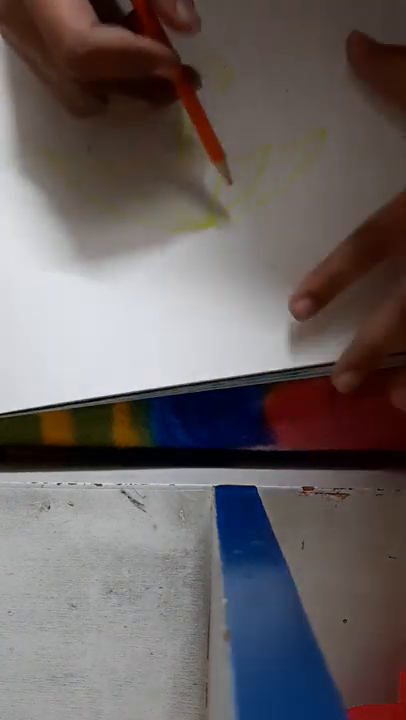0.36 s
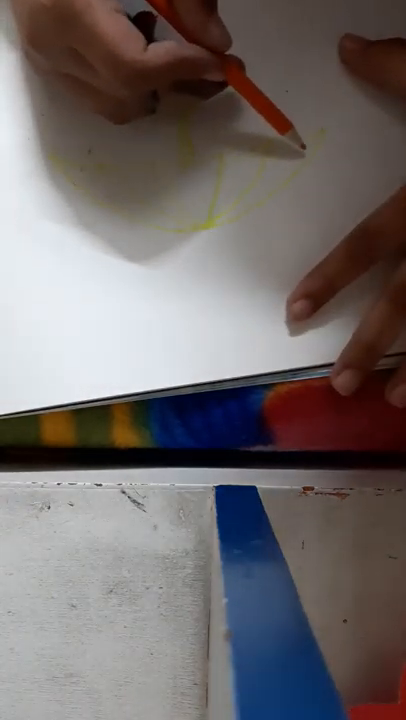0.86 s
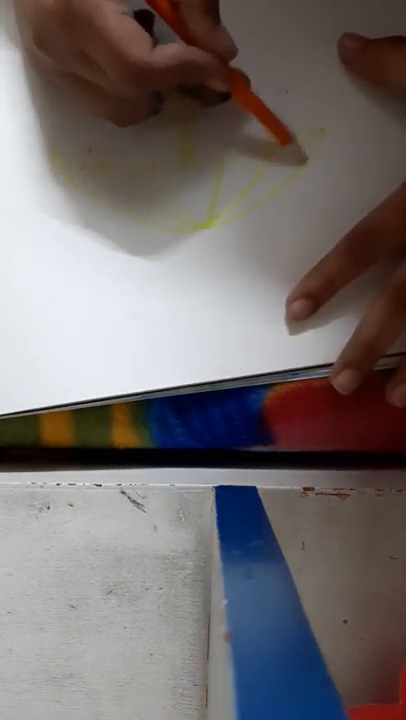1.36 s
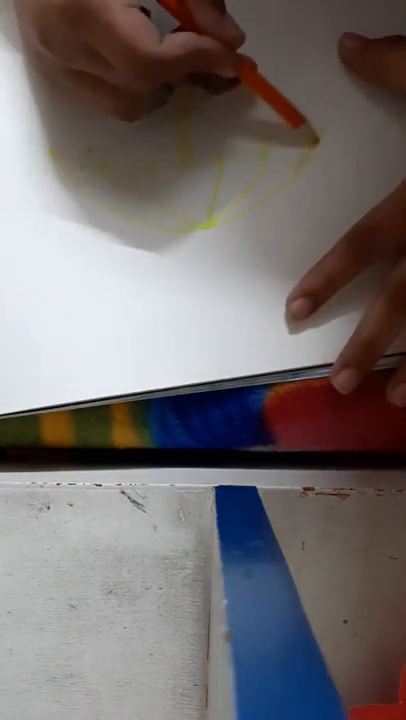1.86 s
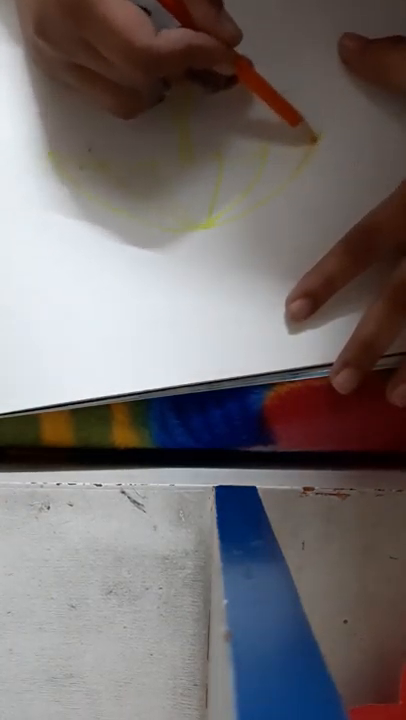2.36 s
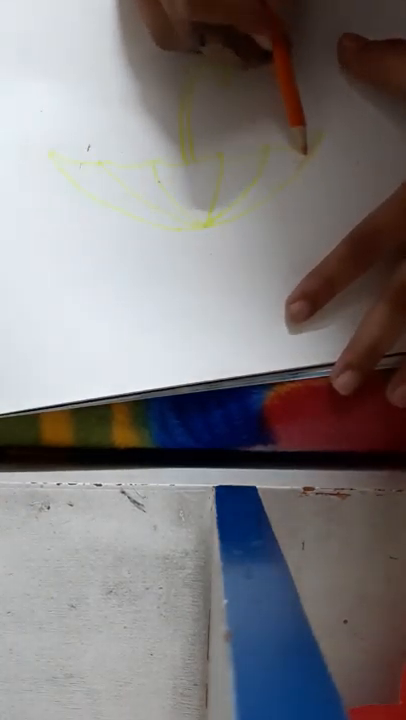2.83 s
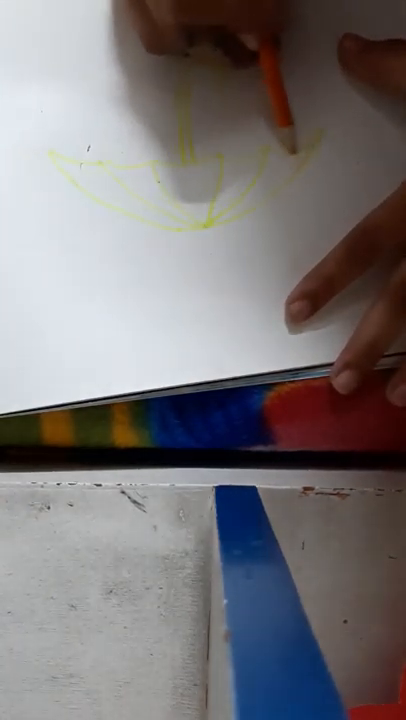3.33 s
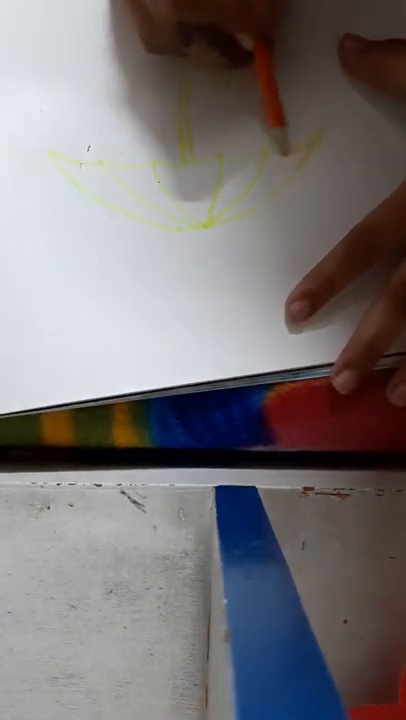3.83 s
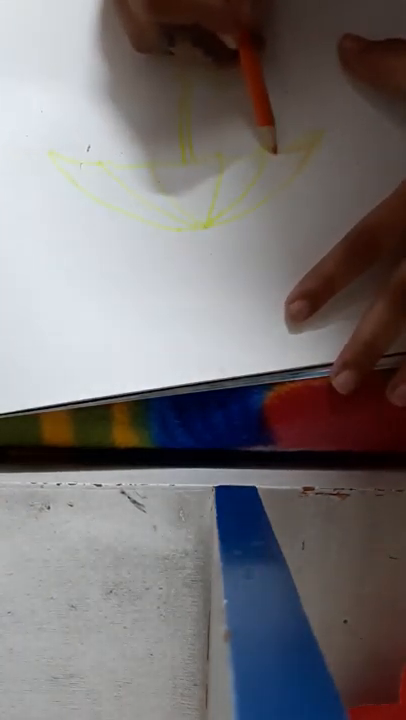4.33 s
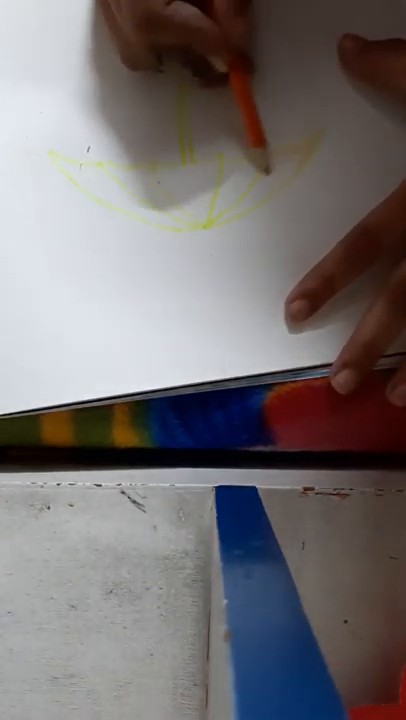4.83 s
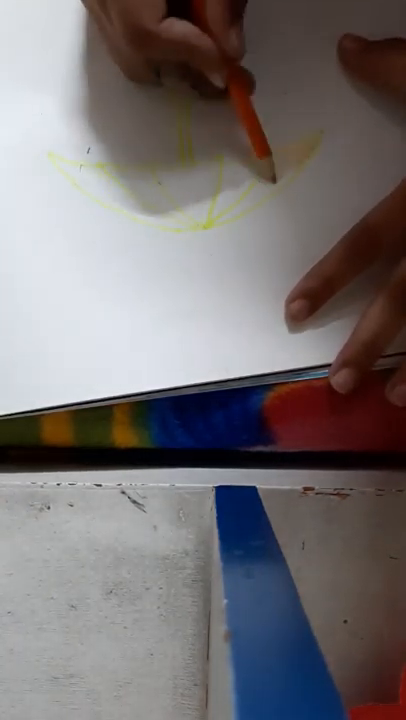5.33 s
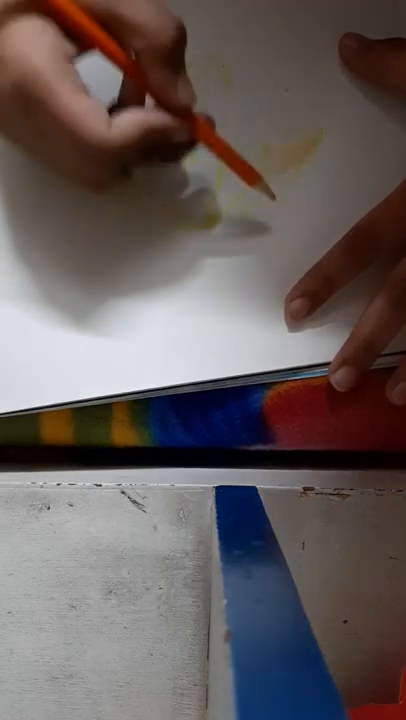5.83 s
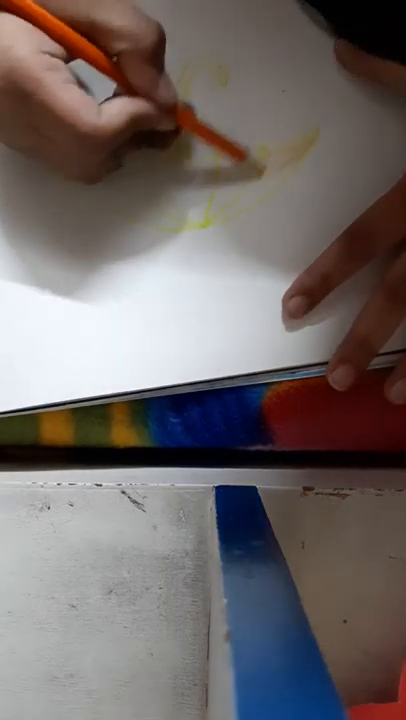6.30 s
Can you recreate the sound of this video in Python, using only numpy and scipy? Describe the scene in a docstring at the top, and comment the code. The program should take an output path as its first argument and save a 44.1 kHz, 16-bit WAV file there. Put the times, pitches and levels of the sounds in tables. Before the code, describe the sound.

A coloured pencil scratches paper in quick short strokes close by, interrupted early by one loud, heavy thump and a clatter in the room.

```python
"""A coloured pencil shades paper in quick back-and-forth strokes, close to the left microphone of a pair:
clicks and noise ring three resonances and a pad, louder as the hand speeds up.
Further off in the room things clatter, bump and rub (grains through resonances); one falls with a heavy
thump and bounces (decaying low modes). Shaped noise makes hiss, a low rumble in the room's bass modes and
the shudder after the heavy thump; a wavering sine makes a hum that comes and goes."""
import sys
import numpy as np
from scipy import signal
from scipy.fft import rfft, irfft, next_fast_len
from scipy.io import wavfile
from scipy.ndimage import uniform_filter1d

SR = 44100
rng = np.random.default_rng(int(sys.argv[2]) if len(sys.argv) > 2 else 0)


def ratio(d):
    """dB to gain"""
    e = np.asarray(d, float) / 20
    return 10 ** e


def waveform_to_disk(signal):
    """Save audio, clipped to [-1, 1], as 16-bit WAV at the path in sys.argv[1]."""
    frames = np.transpose(np.atleast_2d(signal))
    scaled = np.clip(frames, -1, 1) * 32767
    samples = np.round(scaled).astype(np.int16)
    wavfile.write(sys.argv[1], SR, samples)


N = 294588

# Left-right likeness of diffuse sound. Each row: frequency in Hz, correlation from -1 to 1.
LIKENESS = [(60, 0.97), (130, 0.99), (290, 0.79), (640, -0.31), (1410, -0.42), (3100, 0.096), (6820, 0.071),
            (15000, 0.18)]
# Stereo balance of diffuse sound. Each row: frequency in Hz, left minus right in dB.
BALANCE = [(60, -0.5), (110, -3), (200, -6), (380, -12), (700, -3.5), (1290, 6), (2380, -4.5), (4400, -1.5),
           (8120, 0.5), (15000, 0)]


def evened(x):
    """Scales to rms 1."""
    return x / np.sqrt(np.mean(x ** 2) + 1e-20)


def read(points, hz):
    """Interpolates a (Hz, value) table on a log frequency axis."""
    f, value = np.transpose(points)
    return np.interp(np.log(hz + 1), np.log(f + 1), value)


def add(mix, start_s, sound):
    """Mixes a sound in at start_s, cut off at the end of the mix."""
    part = mix[..., max(round(start_s * SR), 0):][..., :sound.shape[-1]]
    part += sound[..., :part.shape[-1]]


def coloured(x, points):
    """Zero-phase filter by a (Hz, dB) table."""
    size = next_fast_len(x.shape[-1])
    gain = ratio(read(points, np.fft.rfftfreq(size, 1 / SR)))
    return irfft(rfft(x, size) * gain, size)[..., :x.shape[-1]]


def band(x, hz, pass_width_hz):
    """A resonance applied twice; the width is that of one pass."""
    b, a = signal.iirpeak(min(hz, SR / 2 - 10), hz / pass_width_hz, SR)
    return signal.lfilter(b, a, signal.lfilter(b, a, x))


def grains(size, per_s, spread_db):
    """Random tiny clicks at rms 1; a spread above 0 makes a few large."""
    hit = rng.random(size) < per_s / SR
    big = np.minimum(rng.exponential(1, size), 5)
    return evened(hit * ratio(spread_db * big) * rng.standard_normal(size))


def diffuse(size, frame, level_db):
    """Noise at rms 1 as two microphones hear a diffuse field; level_db(hz, s) shapes it."""
    frames, hz = 4 * size // frame + 5, np.fft.rfftfreq(frame, 1 / SR)[:, None]
    a, b, c, d = rng.standard_normal((frames, len(hz), 4)).T
    left, other = a + 1j * b, c + 1j * d
    same = np.clip(read(LIKENESS, hz), -1, 1)
    right = same * left + np.sqrt(1 - same ** 2) * other
    lean = ratio(read(BALANCE, hz) / 2)
    z = np.array([left * lean, right / lean])
    z *= ratio(level_db(hz, np.arange(frames) * frame / 4 / SR))
    return evened(signal.istft(z, nperseg=frame, noverlap=3 * frame // 4)[1][:, :size])


def room(sound):
    """Eight early single echoes over a diffuse tail whose bands die at their own speed."""
    # Each row: frequency in Hz, t60 in seconds.
    decay = [(50, 0.37), (130, 0.34), (350, 0.38), (920, 0.25), (2430, 0.35), (6400, 0.27)]
    tail = diffuse(SR // 2, 512, lambda hz, s: -60 * s / read(decay, hz))
    tail = tail * (1 - np.exp(-np.arange(SR // 2) / SR / 0.00072))
    at, size = rng.integers(0, 1200, 8), 4.1 * rng.standard_normal(8)
    tail[0, at] += size
    tail[1, at + 20] += size  # reaches the right microphone just after
    return signal.fftconvolve(sound[None], tail / np.linalg.norm(tail) * np.sqrt(2), axes=1)


def air():
    """Faint hiss in drifting patches; low rumble in the room's modes, with the shudder after the heavy thump."""
    # Hiss spectrum. Each row: frequency in Hz, relative density in dB per Hz.
    hiss_colour = [(210, -23), (350, -5.5), (868, -14.5), (1490, 1.5), (1670, -1), (5430, -7.5), (6570, -5),
                   (7590, -15.5), (9340, -27), (10300, -23), (12000, -14), (13700, -19), (15800, -20)]
    # Swell of the hiss below 9500 Hz; the top stays even. Each row: time in seconds, relative level in dB.
    hiss_swell = [(0, 4.5), (.44, -7.5), (.55, -9.5), (1.1, 0.5), (2.75, -1.5), (3.4, -4.5), (4.1, -3.5),
                  (4.4, -11.5), (4.7, -0.5), (6.68, 4.5)]
    # Low mode bands. Each row: centre in Hz, -6 dB width in Hz, relative level in dB.
    low_bands = [(75.6, 54, 2), (146.6, 17, -2.5), (220.2, 54, -5), (293.2, 51, -6), (469, 47, -20.5)]
    # Level of rumble and of the shudder after the thump.
    # Each row: time in seconds, modes below 100 Hz in dB, upper modes in dB.
    low_levels = [(0.0, -52.5, -60.5), (0.2, -58, -58.5), (0.82, -61, -65.5), (1.28, -59.5, -63),
                  (1.69, -64.5, -57.5), (2.14, -56.5, -49.5), (2.27, -38, -67), (2.36, -34, -35),
                  (2.64, -55.5, -58), (3.54, -65.5, -63), (3.96, -60, -57), (4.48, -58, -61),
                  (5.3, -62, -55.5), (5.62, -59, -57.5), (6.19, -58, -54.5), (6.68, -63, -54.5)]
    hiss_rms_db = -62

    def patches_db(hz, t, bins, rms_db):
        """Random level smoothed over frequency bins and 8 frames."""
        over_hz = uniform_filter1d(rng.standard_normal((len(hz), len(t))), bins, 0)
        return rms_db * evened(uniform_filter1d(over_hz, 8, 1))

    def hiss_db(hz, t):
        """Colour, swell and patches of the hiss."""
        swell_db = np.interp(t, *np.transpose(hiss_swell)) * (hz < 9500)
        return read(hiss_colour, hz) + swell_db + patches_db(hz, t, 20, 4.5)

    out = ratio(hiss_rms_db) * diffuse(N, 2048, hiss_db)
    s, low_db, high_db = np.transpose(low_levels)
    for mode_hz, width_hz, db in low_bands:
        def mode_level_db(hz, t):
            """Resonance curve and patches of one mode."""
            curve_db = -20 * np.log10(1 + (2 * (hz - mode_hz) / width_hz) ** 2)
            return curve_db + patches_db(hz, t, 3, 3.5)
        drift_db = np.interp(np.arange(N) / SR, s, low_db if mode_hz < 100 else high_db)
        out += ratio(db + drift_db) * diffuse(N, 4096, mode_level_db)
    return out


def hum():
    """A low sine of randomly wavering pitch that swells and fades."""
    # Each row: start in seconds, length in seconds, frequency in Hz, level in dB.
    swells = [(0, 0.22, 190.5, -52), (1.42, 0.094, 193.6, -57), (1.54, 0.15, 187.5, -52),
              (1.67, 0.19, 188.3, -46), (4.99, 0.13, 186, -52), (5.08, .24, 179.2, -49),
              (6.29, 0.08, 186, -52.5)]
    waver_rms_hz, waver_smooth_s = 4.6, 0.059
    out = np.zeros((2, N))
    smooth = uniform_filter1d(rng.standard_normal(N), round(waver_smooth_s * SR))
    waver_hz = waver_rms_hz * evened(smooth)
    for s, length_s, hz, db in swells:
        swell = signal.windows.tukey(round(length_s * SR), .7)
        now_hz = hz + waver_hz[round(s * SR):][:len(swell)]
        tone = np.sin(2 * np.pi * np.cumsum(now_hz) / SR)
        sides_db = db + read(BALANCE, hz) / 2 * np.array([[1], [-1]])
        add(out, s, np.sqrt(2) * ratio(sides_db) * swell * tone)
    return out


def clatter(rows, shape):
    """Clicks under shape(time / length) excite each event's own ring and shared modes, heard via the room."""
    # Shared modes. Each row: frequency in Hz, width of one pass in Hz, level in dB.
    modes = [(1240, 96, -12), (2052, 200, -2), (3030, 64, -22), (5000, 270, -4)]
    out = np.zeros((2, N))
    t = np.arange(SR // 5) / SR
    for s, energy_db, ring_hz, treble_db, low_db, length_s in rows:
        rattle = grains(len(t), 3000, 6.55) * shape(t / length_s)
        body = [(250, low_db - 16), (700, low_db), (1500, 0.0), (4000, -5.0),
                (6000, treble_db + 1), (15000, treble_db - 8.5)]
        rattle = coloured(np.pad(rattle, (200, 0)), body)  # room for the filter's pre-ring
        rattle = rattle + 0.81 * band(rattle, ring_hz, 0.5 * ring_hz)
        rattle = rattle + sum(ratio(db) * band(rattle, hz, width_hz) for hz, width_hz, db in modes)
        add(out, s - 200 / SR, ratio(energy_db) * room(rattle / np.linalg.norm(rattle)))
    return out


def long_rattles():
    """Longer rattles and rubs, one a pencil stroke: the clicks rise, hold and stop."""
    # Each row: start in seconds, energy in dB, ring in Hz, treble in dB, length in seconds.
    rubs = [(0, -21.5, 1960, -28, 0.0082), (0.086, -20, 4480, 0, 0.023), (0.153, -29.5, 4450, 13, 0.072),
            (1.647, -21, 2700, -5, 0.13), (2.368, -12.5, 1940, -10, 0.045), (2.85, -17, 2020, -14.5, 0.049),
            (3.65, -20.5, 3000, -11, 0.2), (4.014, -19.5, 2680, -24, 0.091)]
    low_mid_db = -4
    rows = [(*row[:-1], low_mid_db, row[-1]) for row in rubs]
    return clatter(rows, lambda u: np.clip(8 * u, .3, 1) * (u < 1))


def knocks():
    """Knocks: a brief rattle with a rounded rise and fall."""
    # Each row: start in seconds, energy in dB, ring in Hz, treble in dB, low-mid in dB.
    hits = [(0.137, -13.5, 1840, -7.5, 2.5), (1.696, -16.5, 1560, -22, -26), (1.719, -9, 2580, -9, -16),
            (1.746, -16, 1930, -14, 4), (2.0779, 5.5, 4700, -3, -6), (2.0883, 12.5, 2120, -5, 10),
            (2.2248, -10, 1620, -12, 7), (2.3501, -9.5, 680, -31, 14), (2.6535, -13.5, 2340, -10.5, -8),
            (2.8338, -15, 2050, -11, 7.5), (2.979, -22, 1690, -14, 4.5), (3.062, -26.5, 1720, -15, 0),
            (3.721, -24, 2220, -17, 0), (3.854, -16, 2420, -12, -8), (4.013, -24, 1200, -5, -8),
            (4.196, -10.5, 2600, -18.5, -6.5), (4.753, -15.5, 1340, -19, 0.5), (5.7572, -11, 814, -8, 10.5)]
    rattle_s = 0.0094
    return clatter([(*row, rattle_s) for row in hits], lambda u: (1 - np.exp(-6 * u)) * np.exp(-u ** 2))


def thumps():
    """A soft blow rings the low modes, and a dull wash spreads through the room."""
    # Each row: start in seconds, level in dB, weight below 100 Hz in dB, factor on ring length.
    blows = [(0.014, -53, 9, 0.25), (0.142, -37.5, -3, 0.64), (0.423, -46.5, 17.5, 0.31),
             (1.168, -47.5, 17.5, 0.36), (1.859, -39.5, -8, 0.12), (2.105, -3, -5.5, 0.58),
             (2.153, -12.5, 0.5, 0.41), (2.35, -15.5, -26, 0.65), (2.384, -21, -1, 1),
             (2.833, -42.5, -6.5, 0.99), (2.973, -43.5, -3, 0.48), (3.05, -49, 15, 0.41),
             (5.781, -38, 11, 0.59)]
    # Floor and room modes. Each row: frequency in Hz, level in dB, t60 in seconds before that factor.
    modes = [(58.4, -3, 0.64), (128, -8, 0.68), (187.1, 6.5, 0.26), (283.7, 4.5, 0.24), (321.3, 4.5, 0.28),
             (362, -12, 0.21), (487, -7, 0.32), (653, -14, .2)]
    blow_s, ring_db, wash_peak_db = 0.0034, -3.5, -3
    out, t = np.zeros((2, N)), np.arange(SR) / SR
    blow = np.hanning(round(blow_s * SR))
    for s, db, weight_db, lasting in blows:
        ring = np.zeros((2, SR))
        for hz, mode_db, t60_s in modes:
            # phase between the microphones
            apart = np.arccos(np.clip(read(LIKENESS, hz), -1, 1)) * np.array([[0], [1]])
            sides_db = read(BALANCE, hz) / 2 * np.array([[1], [-1]])
            level_db = mode_db + weight_db * (hz < 100) + sides_db
            ring += ratio(level_db - 60 * t / (t60_s * lasting)) * np.sin(2 * np.pi * hz * t + apart)
        ring *= 1 - np.exp(-t / 0.016)
        ring = signal.fftconvolve(ring, blow[None] / blow.sum(), axes=1)
        dull = [(40, weight_db - 21.0), (80, weight_db), (125, -2), (250, -6),
                (400, -20.5), (900, -22.0), (2500, -54)]
        wash = room(coloured(np.pad([1.], 800), dull))  # impulse at sample 800
        add(out, s, ratio(db + ring_db) * ring)
        add(out, s - 800 / SR, ratio(db + wash_peak_db) * wash / abs(wash).max())
    return out


def pencil():
    """Paper fibres click under the tip; the hand speeds up and slows down in every stroke."""
    # Each row: start in seconds, length in seconds, upper ring in dB, middle ring in dB.
    strokes = [(0.292, 0.063, -59, -59.5), (0.999, 0.12, -64, -67.5), (1.119, 0.106, -60, -65.5),
               (1.282, 0.062, -55, -65), (1.39, 0.08, -59.5, -62.5), (1.512, 0.086, -58, -63.5),
               (1.624, 0.19, -50.5, -54.5), (1.853, 0.075, -57.5, -64), (1.978, 0.054, -54, -69),
               (2.285, 0.083, -63, -70), (2.449, 0.2, -55.5, -62), (2.91, 0.04, -65, -73),
               (2.979, 0.069, -58, -69), (3.097, 0.066, -53.5, -60), (3.203, 0.063, -52, -62.5),
               (3.315, 0.078, -55.5, -64), (3.415, 0.063, -54.5, -63), (3.515, 0.086, -57, -60),
               (3.629, 0.072, -53.5, -62), (3.733, 0.117, -54, -60), (3.867, 0.062, -52.5, -59),
               (3.955, 0.094, -54.5, -60.5), (4.071, 0.066, -53.5, -64.5), (4.179, 0.09, -59, -66),
               (4.276, 0.046, -61, -69), (4.35, 0.14, -67, -80), (4.476, 0.074, -58.5, -64.5),
               (4.588, 0.091, -55, -55.5), (4.685, 0.089, -49, -52.0), (4.807, 0.087, -49, -50.5),
               (4.927, 0.074, -46.5, -50.5), (5.051, 0.076, -46, -49.5), (5.162, 0.073, -48.5, -47),
               (5.281, 0.08, -48, -47), (5.403, 0.077, -51.5, -49.5), (5.525, 0.068, -46, -49.5),
               (5.612, 0.071, -54.5, -51.5), (5.691, 0.25, -50, -56), (5.953, 0.11, -61, -68),
               (6.071, 0.11, -52, -62), (6.187, 0.09, -45.5, -59.5), (6.308, 0.066, -43, -57),
               (6.418, 0.057, -44, -74), (6.516, 0.055, -44.5, -66), (6.618, 0.061, -45.5, -62)]
    # Dull scrape, then body of the pad. Each row: frequency in Hz, width of one pass in Hz, level in dB.
    dull_parts = [(4810, 3940, 0.5), (1100, 4400, -4)]
    # Rings by the tip's place on the pad. Each row: time in seconds, upper ring in Hz,
    # lower rings in dB over the mean of upper and middle.
    place = [(.3, 12900, -0.5), (1.1, 13100, 2), (1.7, 13000, -6.5), (2.5, 13400, 0.5), (3.1, 14000, -3),
             (3.799, 13800, -5), (4.3, 14100, 2.5), (4.7, 14500, -5), (5.1, 14900, -8),
             (5.499, 13900, -7.5), (5.85, 12900, 4.5), (6.15, 12600, 1), (6.68, 12600, -6.5)]
    # The tip touches down. Each row: start in seconds, level in dB.
    touches = [(0.0145, -33), (0.428, -43), (1.6248, -46), (4.445, -59), (4.654, -42)]
    lower_ring, middle_ring = (7600, 900, 0), (10800, 1400, 0)  # Hz, width of one pass in Hz, dB
    upper_width_hz = 2800  # one pass
    fastest_at = 0.6  # share of the stroke done when the hand is fastest
    tap_t60_s, right_lag_s = .018, .0015
    right_direct_db, right_scatter_db, room_db = -16.5, -17.5, -14  # right levels ahead of its colouring

    # row 0 reaches the left microphone, row 1 is scattered
    fibres = np.array([grains(N + SR, per_s=12000, spread_db=0), rng.standard_normal(N + SR)])
    lower, middle, scrape, pad = [ratio(db) * evened(band(fibres, hz, width_hz))
                                  for hz, width_hz, db in [lower_ring, middle_ring, *dull_parts]]
    low_parts = lower + scrape + pad
    out = np.zeros((2, N))
    place_s, upper_hz, duller_db = np.transpose(place)
    for s, length_s, upper_db, middle_db in strokes:
        u = np.arange(0, 1, 1 / (length_s * SR))
        speed = np.sin(np.pi * u ** (np.log(.5) / np.log(fastest_at))) ** 0.46
        now = slice(round(s * SR), round(s * SR) + len(u))
        upper = evened(band(fibres[:, now], np.interp(s, place_s, upper_hz), upper_width_hz))
        lower_db = np.interp(s, place_s, duller_db) + (upper_db + middle_db) / 2
        sound = ratio(upper_db) * upper - ratio(middle_db) * middle[:, now]
        sound = sound + ratio(lower_db) * low_parts[:, now]
        add(out, s, speed * sound)
    t = np.arange(SR // 20) / SR
    for s, db in touches:
        tap = coloured(rng.standard_normal((2, len(t))), [(800, -3.5), (4000, 5), (15000, -2.0)])
        add(out, s, ratio(db - 60 * t / tap_t60_s) * tap)
    near, scattered = out
    far = ratio(right_direct_db) * np.roll(near, round(right_lag_s * SR)) + ratio(right_scatter_db) * scattered
    far = coloured(far, [(3000, 10.5), (7000, 8), (11000, 1), (13000, -2), (15500, 0)])
    return np.array([near, far]) + ratio(room_db) * room(scattered)[:, :N]


def scene():
    """All sources at the two microphones."""
    return air() + hum() + long_rattles() + knocks() + thumps() + pencil()


def low_pass(x):
    """Removes everything above the highest recorded frequency."""
    return signal.sosfilt(signal.butter(12, 16290, fs=SR, output="sos"), x)


def record(dry):
    """Response of the microphones, applied to the whole mix."""
    # Bass cut, port notch and top edge. Each row: frequency in Hz, gain in dB.
    response = [(25, -18), (45, 2.5), (8100, -4), (8900, -11.5), (9700, -5), (10200, -7), (15700, -2.5),
                (15950, -28)]
    return low_pass(coloured(dry, response))


dry = scene()
out = record(dry)
waveform_to_disk(out)
```